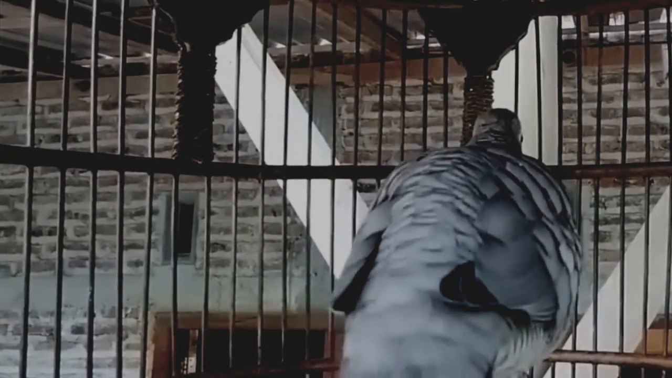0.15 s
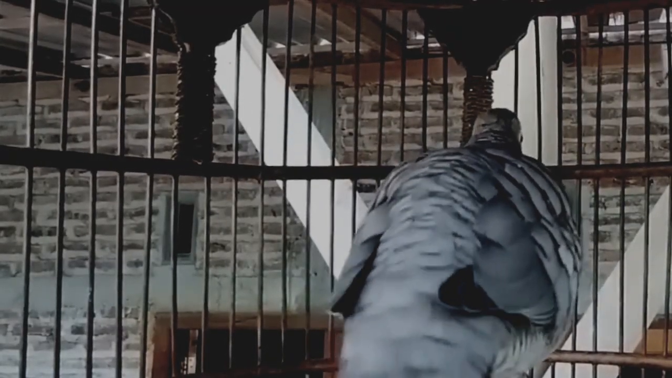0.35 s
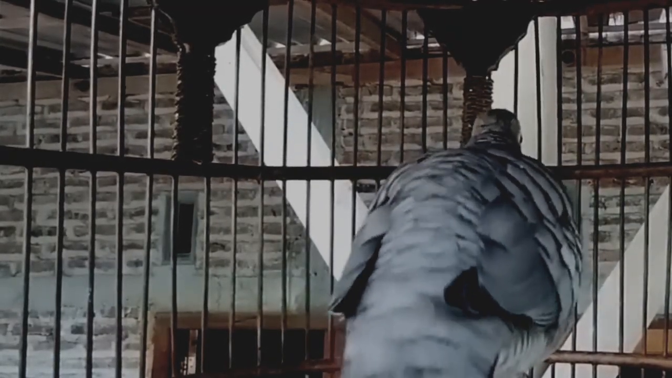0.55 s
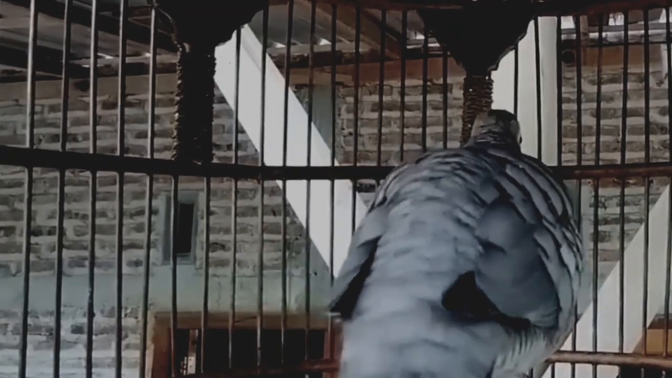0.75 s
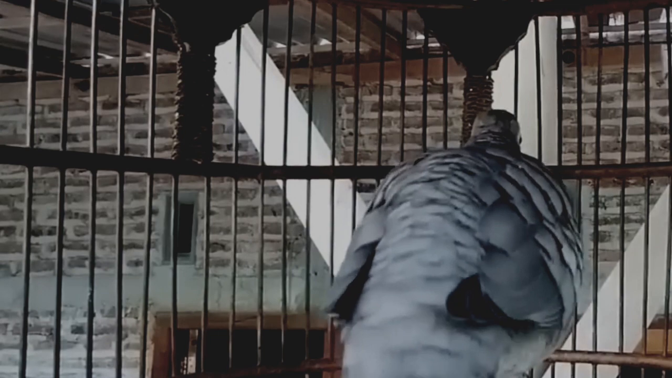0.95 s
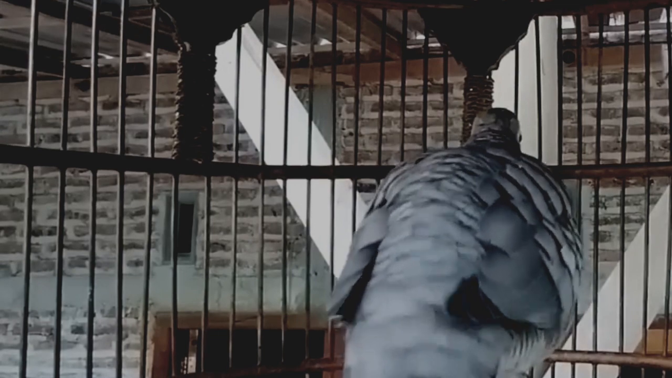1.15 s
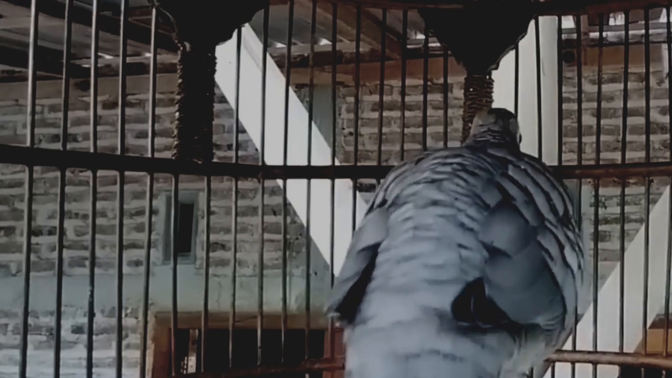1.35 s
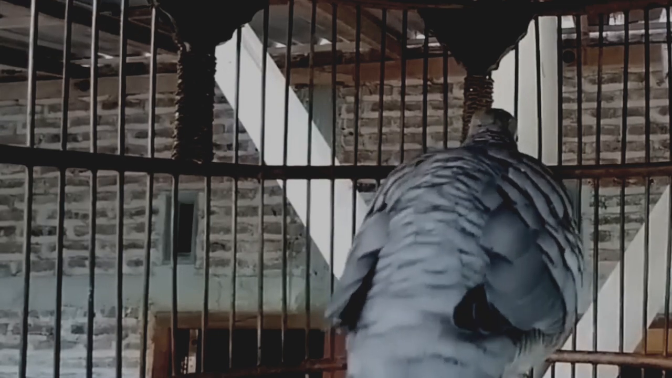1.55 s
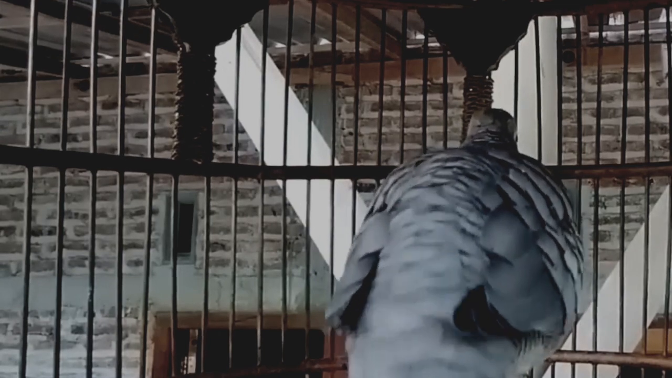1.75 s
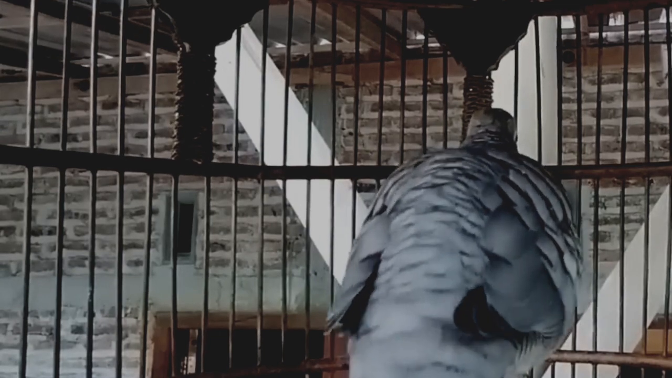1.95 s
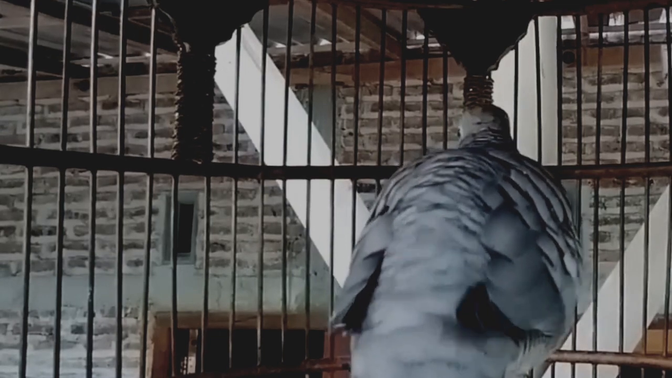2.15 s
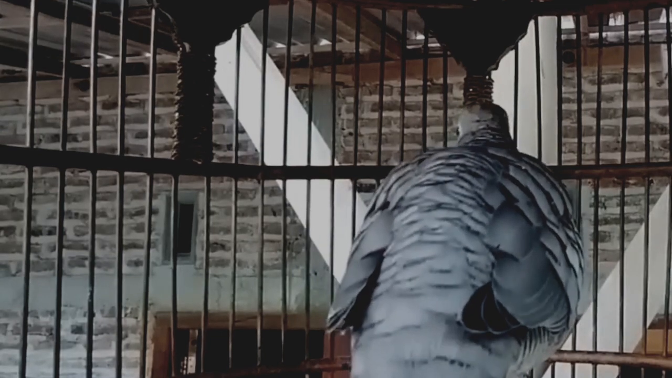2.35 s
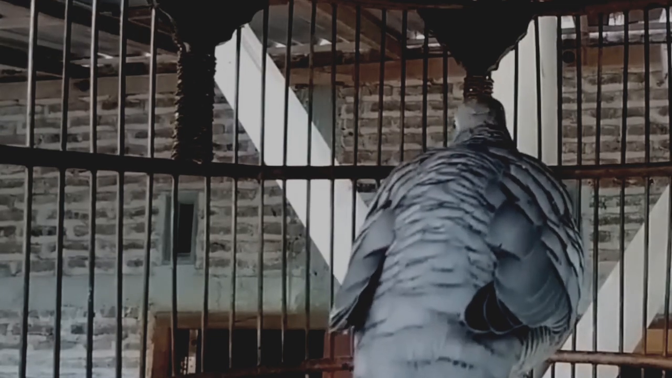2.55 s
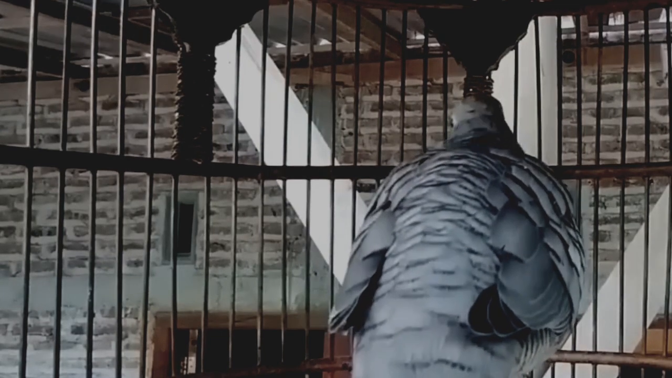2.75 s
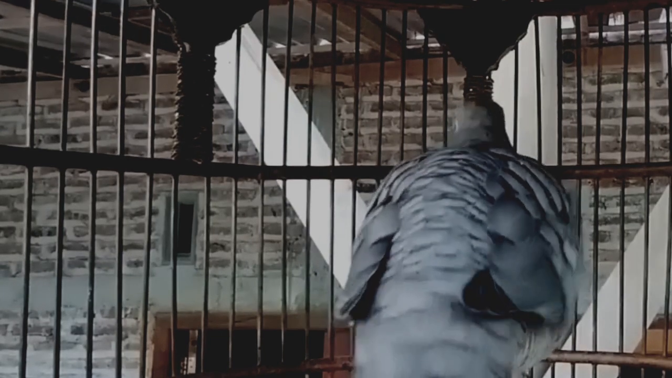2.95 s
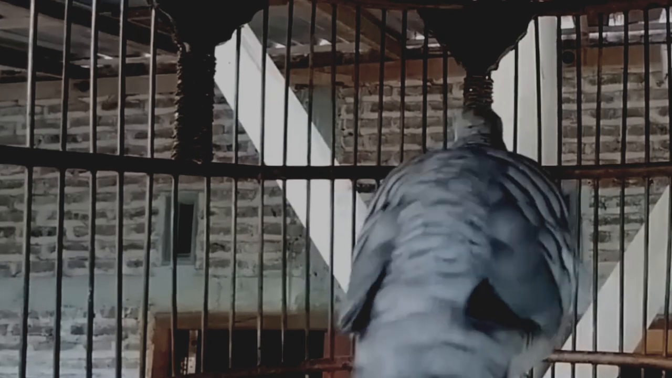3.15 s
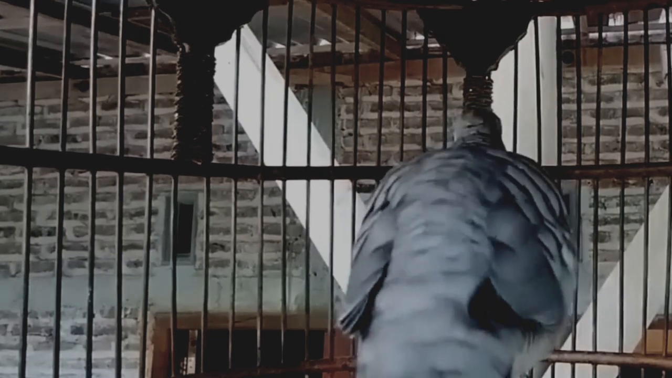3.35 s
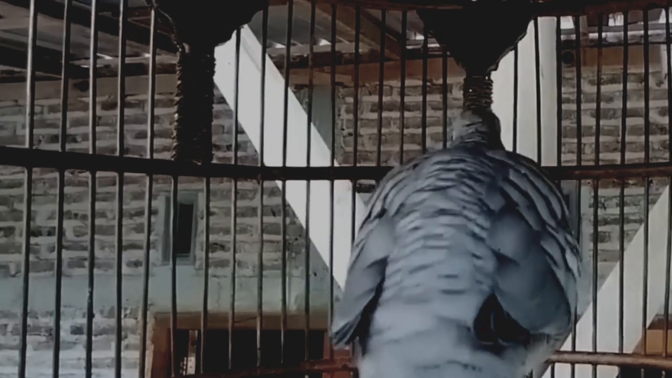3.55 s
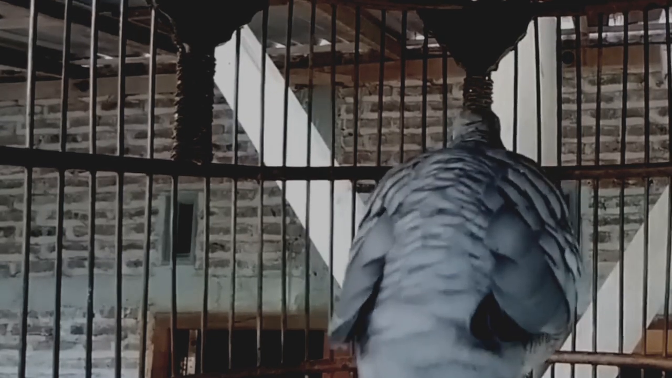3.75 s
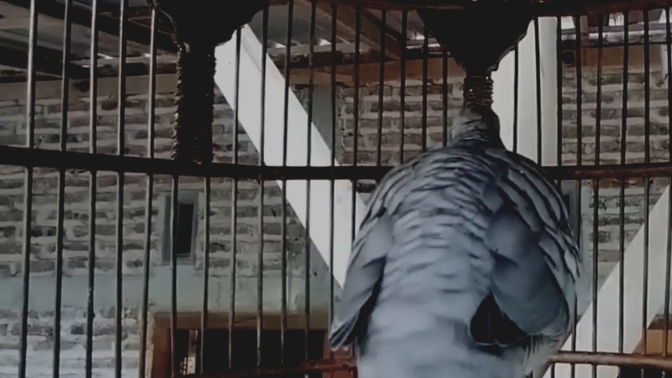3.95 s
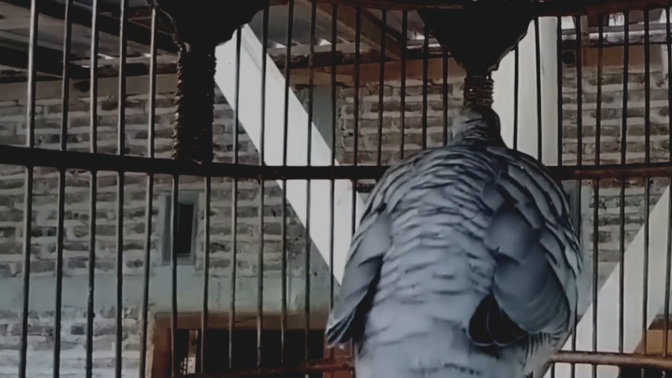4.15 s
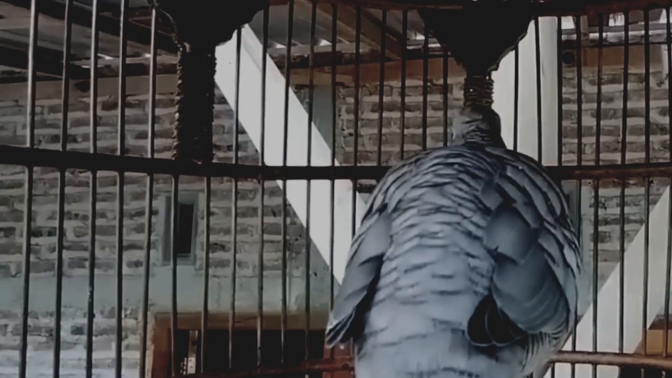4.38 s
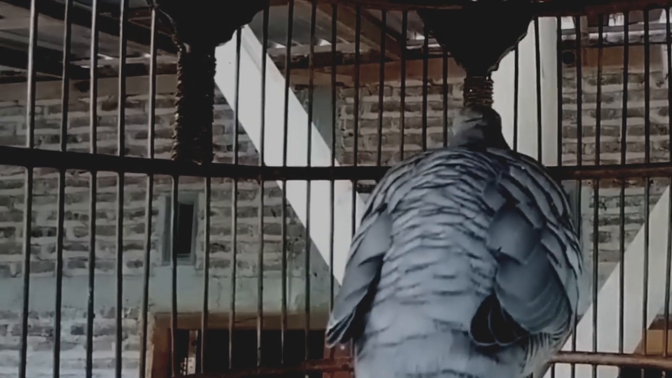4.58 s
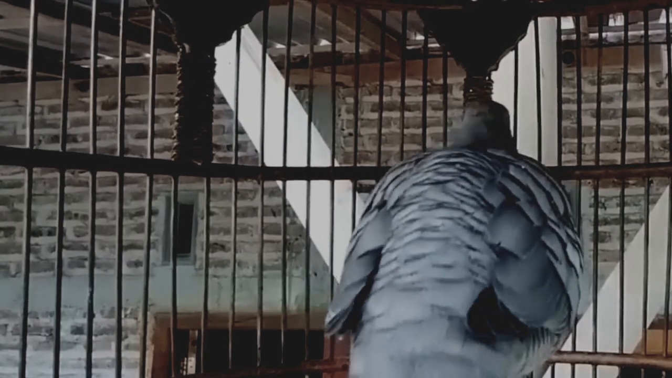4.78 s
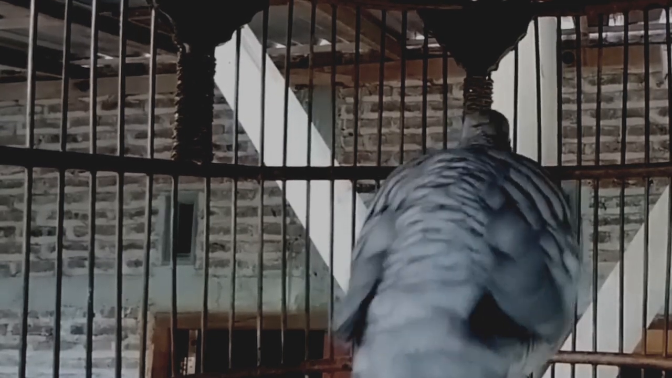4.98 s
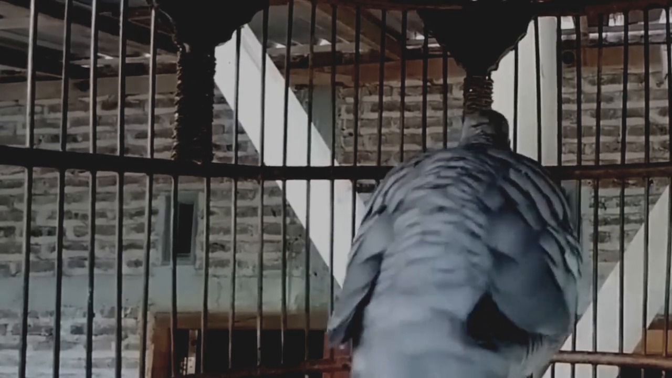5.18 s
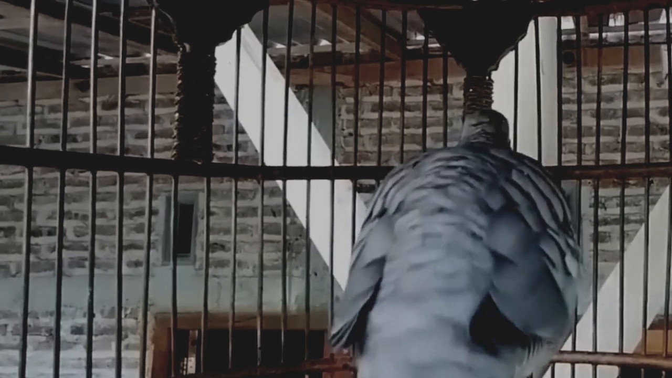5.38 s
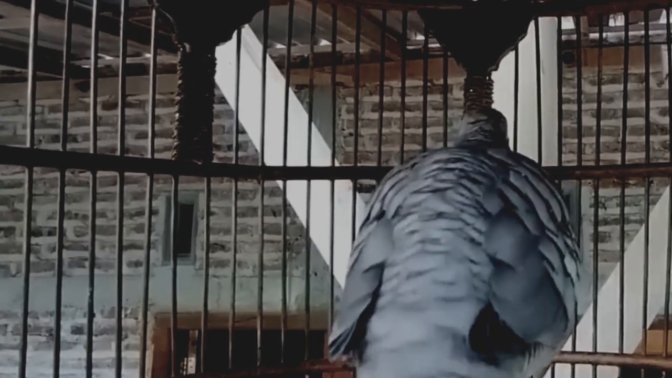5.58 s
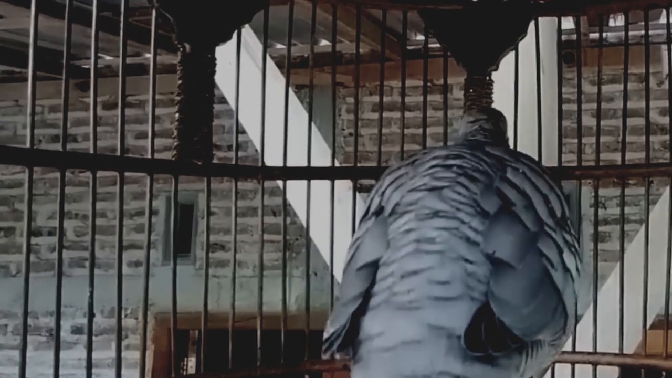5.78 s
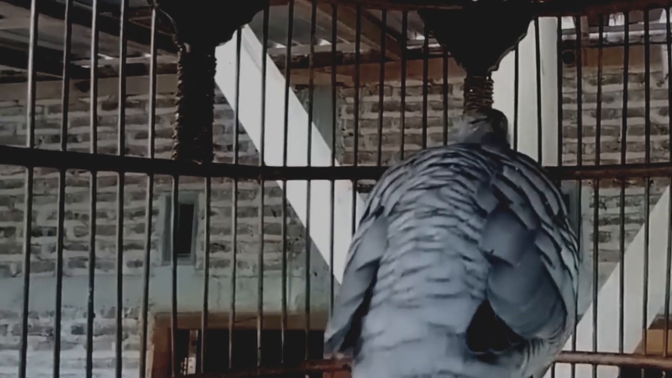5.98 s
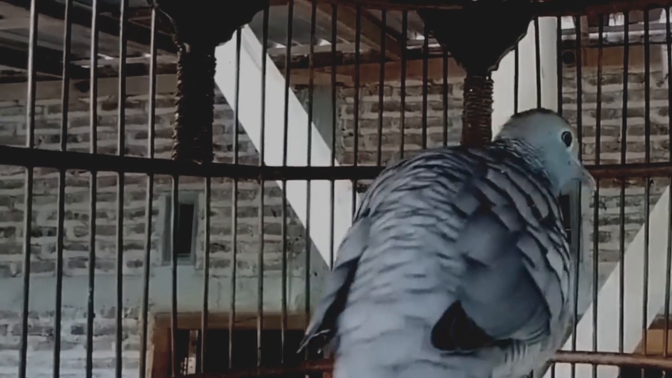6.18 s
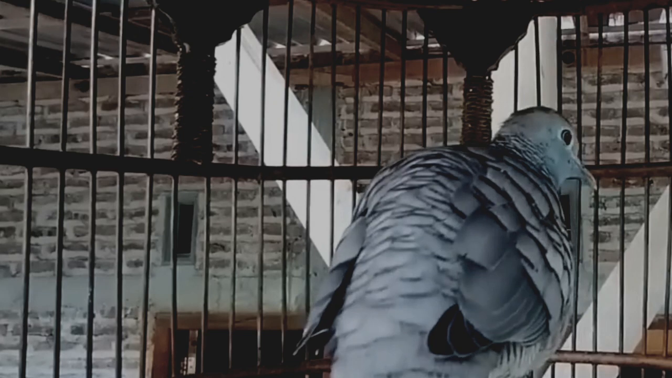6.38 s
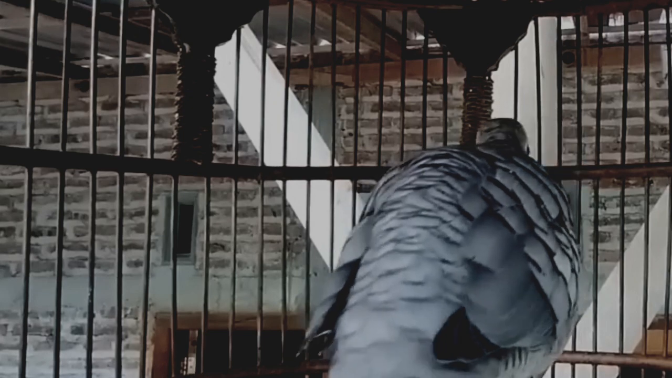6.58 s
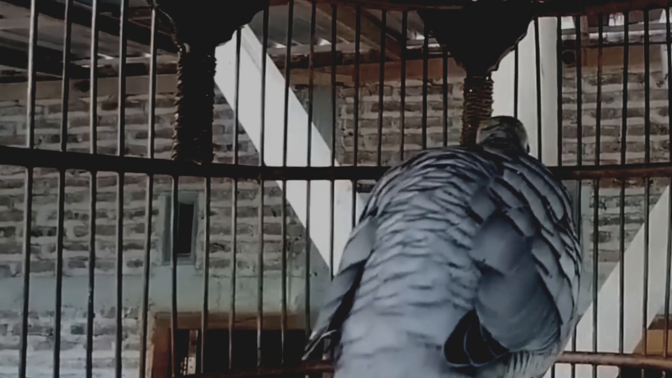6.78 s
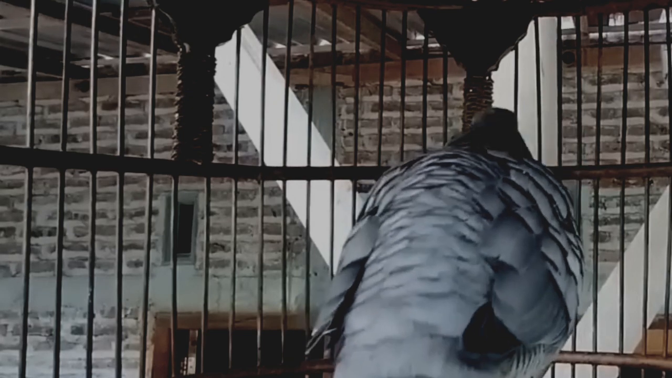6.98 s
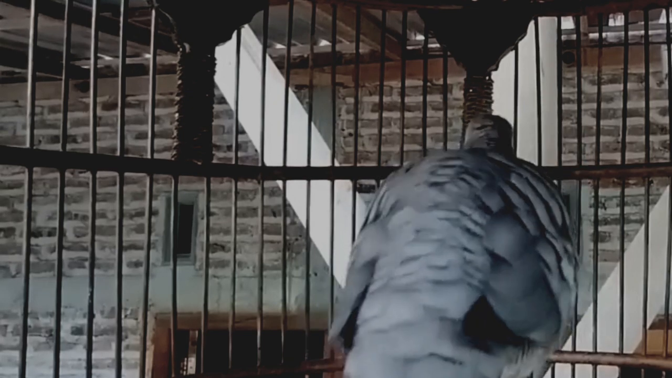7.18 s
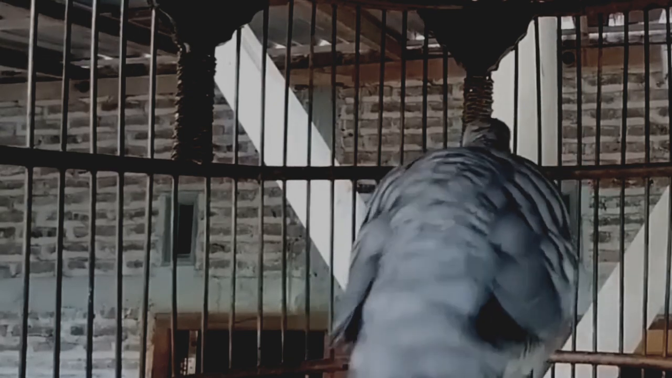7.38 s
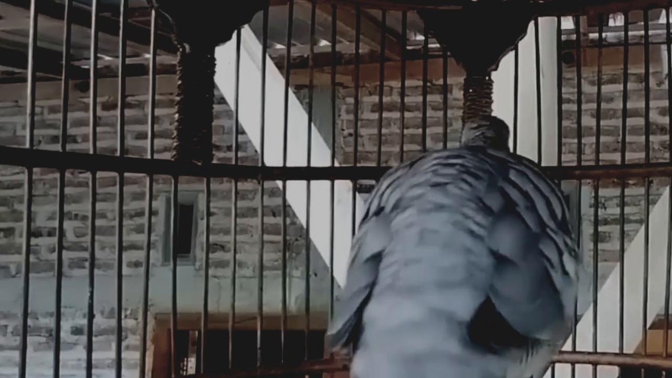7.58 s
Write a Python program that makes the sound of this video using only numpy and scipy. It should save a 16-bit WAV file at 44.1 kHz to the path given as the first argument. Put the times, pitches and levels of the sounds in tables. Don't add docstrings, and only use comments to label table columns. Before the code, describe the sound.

A dove in a cage dominates, loud and hollow, ringing off brick and roof. Steady coos at about five a second come first, then quick trills that decelerate, separated by rests. A second dove overlaps at the start, middle and end, and very faint ones answer far away. Regular thin chirps, a few raspy ones, soft claw taps, a distant flock, a faint pulsing insect and low traffic fill the yard behind the close microphone.

```python
import sys
import numpy as np
from scipy import signal
from scipy.fft import rfft, irfft, next_fast_len
from scipy.io import wavfile
from scipy.ndimage import uniform_filter1d, minimum_filter1d

SR = 44100
rng = np.random.default_rng(int(sys.argv[2]) if len(sys.argv) > 2 else 0)


def dump(signal):
    limited = np.clip(np.atleast_2d(signal).T, -1, 1)
    pcm = np.round(limited * 32767).astype(np.int16)
    wavfile.write(sys.argv[1], SR, pcm)


def invert_db(level):
    return 10 ** (np.asarray(level, dtype=float) / 20)


N = 336483

# voice break t/s, hold/s, held f/Hz, level/dB
SLOW_COOS = [(0.108, 0.078, 1218, -3.5), (0.312, 0.076, 1218, -4), (0.516, 0.074, 1211, -2),
             (0.724, 0.074, 1212, -2.5), (0.934, 0.074, 1211, -1), (1.147, 0.077, 1209, -2),
             (1.366, 0.077, 1201, -2.5), (1.584, 0.075, 1192, -3), (1.82, 0.053, 1182, -2.5),
             (2.022, 0.065, 1177, -2), (2.236, 0.064, 1170, -3.5)]
# voice break t/s, hold/s, held f/Hz, level/dB
TRILLS = [(3.129, 0.023, 1210, -2), (3.182, 0.016, 1167, -3.5), (3.235, 0.021, 1152, -4),
          (3.323, 0.024, 1142, -4), (3.419, 0.022, 1149, -2.5), (3.527, 0.027, 1143, -3.5),
          (3.649, 0.028, 1164, -2), (3.795, 0.049, 1163, -1.5), (3.996, 0.068, 1163, -5.5),
          (4.98, 0.025, 1208, -3.5), (5.026, 0.024, 1198, -3), (5.08, 0.02, 1138, -4),
          (5.155, 0.024, 1133, -5.5), (5.253, 0.023, 1147, -3.5), (5.364, 0.027, 1149, -3.5),
          (5.488, 0.025, 1167, -2), (5.634, 0.079, 1171, -4), (7.297, 0.011, 1260, -4),
          (7.33, 0.029, 1209, -3.5), (7.378, 0.028, 1197, -4), (7.438, 0.018, 1184, -5.5),
          (7.54, 0.032, 1132, -6.5)]
# multiple, left level/dB, right level/dB, right phase/rad, extra in lead-in/dB
OVERTONES = [(2, -48.5, -53, 0.75, 7), (3, -52.5, -45, 1.4, -13.5), (4, -58, -53.5, 0.4, -17.5),
             (5, -54.5, -40.5, 6.3, -20), (6, -53, -55, 0.67, -21)]
# f/Hz, width/Hz, level/dB
SCRATCH_MODES = [(882, 430, 6), (1297, 185, 8.5), (1640, 300, -24.5)]
ECHO_S = [
    [.0137, .0171, .0244, .0405, .059, .081],
    [.0137, .0176, .0234, .0414, .0497, .066],
]
ECHO_DB = [
    [-17, -23, -25.5, -15.5, -34, -26.5],
    [-17, -21.5, -25.5, -17.5, -27.5, -27],
]
# t/s, low climb/s, high hold/s, f after break/Hz, level/dB
NEIGHBOUR_COOS = [
    (-.074, 0.033, .052, 1260, -15),
    (0.186, .034, 0.083, 1237, -17),
    (3.725, 0.05, 0.13, 1260, -17.5),
    (4.122, .032, .05, 1280, -17),
    (4.294, 0.048, .07, 1293, -17.5),
    (7.609, 0.056, .06, 1280, -14.5),
]
# t/s, length/s, top f/Hz, level/dB
NEIGHBOUR_HOOTS = [
    (0.427, 0.036, 1180, -16.5),
    (3.934, 0.035, 1133, -16.5),
    (7.459, 0.044, 1339, -20),
    (7.488, 0.087, 1187, -13.5),
]
# t/s, low climb/s, high hold/s, f after break/Hz, level/dB
FAR_COOS = [
    (6.579, 0.032, .11, 1244, -47.5),
]
# t/s, length/s, top f/Hz, level/dB
FAR_HOOTS = [
    (6.714, .04, 1220, -49),
    (6.751, .045, 1152, -47),
    (6.811, .04, 1102, -45.5),
    (6.871, 0.023, 1020, -50),
    (6.938, 0.027, 1003, -48.5),
    (7.024, 0.043, 1138, -46),
]
# t/s, length/s, f/Hz, level/dB
LOW_MOANS = [
    (1.15, 0.18, 515, -48.5),
    (2.117, 0.081, 625, -48.5),
    (2.286, 0.23, 638, -43.5),
    (2.42, 0.2, 628, -50),
]
# t from start/s, f/Hz, level/dB
RISING = [(0, 4500, -62), (.012, 5020, -52), (.035, 5060, -62), (.048, 5260, -49), (.09, 5400, -52),
          (.13, 6000, -48), (.165, 7300, -48), (.18, 7550, -51), (.2, 7550, -66)]
# t/s, level/dB
RISING_AT = [
    (0.093, 5),
    (4.227, 4.5),
    (6.83, 2.5),
]
# t from start/s, f/Hz, level/dB
TICK = [(0, 3412, -68.5), (.008, 4270, -59.5), (.014, 4843, -53.5), (.035, 4765, -58), (.08, 4790, -73.5)]
# t from start/s, f/Hz, level/dB
SWOOP = [(.052, 4360, -75.5), (.062, 3440, -58.5), (.075, 3150, -55.5), (.095, 2740, -54),
         (.115, 2400, -72)]
# t/s, tick level/dB, swoop level/dB
CHIRPS_AT = [(.085, -1.5, -9), (.455, 1.5, -8.5), (0.826, 4, -19), (1.194, -0.5, 4), (1.565, 8.5, 7),
             (1.765, 4, 2), (2.163, 4.5, -1.5), (2.52, 3.5, 6.5), (2.88, 0.5, -5), (3.24, 2.5, 5),
             (3.61, 5, 5), (3.974, 6, -2), (4.375, 4, 0), (4.751, 4, 0.5), (5.138, 2, 3.5), (5.495, 4, 6),
             (5.855, 2, 4.5), (6.222, 4.5, 1), (6.588, 1.5, 4.5), (6.953, 2, 4), (7.279, 5.5, 6.5)]
# t before stretching/s, share of top f, level/dB
ARC = [(0, .8, -68), (.02, .93, -59), (.045, 1, -57.5), (.07, .97, -58), (.095, .87, -54), (.105, .8, -68)]
# t/s, top f/Hz, stretch, level/dB
ARCS_AT = [(0.549, 2930, 1.4, -2.5), (0.799, 3170, 1.5, -6), (1.05, 2790, 1.54, -4),
           (1.318, 3480, 0.89, -3.5), (1.78, 3470, 1.04, 1.5), (2.198, 3300, .6, 2.5),
           (2.661, 2874, 0.66, 7), (2.734, 3350, 0.32, 2), (3.029, 2834, 0.92, 3.5), (3.1, 3210, 0.63, 4),
           (4.569, 3770, 0.7, 0), (5.798, 2870, 0.38, 6.5), (6.057, 3490, 0.95, 1), (6.254, 2860, 0.39, 7),
           (6.513, 3390, 1.1, 1.5), (6.718, 2835, 0.32, 11.5), (6.975, 3510, 0.96, 2.5)]
# t/s, length/s, low f/Hz, high f/Hz, level/dB
RASPS = [
    (2.365, 0.11, 5200, 6290, -56),
    (2.879, 0.071, 4710, 6960, -48),
    (4.208, 0.051, 5110, 6960, -55),
    (6.447, 0.12, 5000, 5890, -58),
]
# t/s, peak level/dB, top f/Hz
TAPS = [
    (3.043, -28.5, 4050),
    (4.091, -31.5, 4120),
    (4.893, -27, 3950),
    (5.126, -21.5, 4020),
    (7.203, -33.5, 3980),
    (7.606, -26, 4010),
]
# f/Hz, level per Hz/dB
RUMBLE = [(13, -31), (38, -0.5), (92, -5.5), (141, -10.5), (281, -11.5), (563, -24), (920, -29.5),
          (1010, -27.5), (1180, -34), (1290, -34), (2200, -36), (2690, -35), (4110, -37), (4600, -39),
          (5980, -69), (10100, -120)]
# f/Hz, level per Hz/dB
HISS = [(4200, -20), (5000, -4), (5300, -5), (5900, -3), (6400, -3), (6750, -5), (7050, -11), (7900, -12),
        (9300, -4), (9800, -5), (10600, -13), (11200, -23), (13000, -12), (15300, -19)]
# f/Hz, likeness
LIKENESS = [(60, 0.68), (150, 0.94), (380, 0.8), (940, 0.11), (2360, 0), (5910, 0), (14800, 0.41)]

START_HZ, LEAD_HZ, RISE_S = 783.7, 982.2, 0.0081
LEAD_START_DB, LEAD_END_DB, LOW_GROWTH_S = -20.5, 0.5, 0.022
RING_ON_S, CATCH_S = 0.003, 0.005
ARCH_UP, ARCH_DOWN = 0.034, 0.035
RELEASE_S, SLOW_SAG_DB, TRILL_SAG_DB = 0.014, -1, -9
GLIDE_S = 0.007
PITCH_JITTER_RAD = 0.007
WAVER_DB = 1.8
LAST_BREAK_S = -0.14
LEAD_MAX_S, LEAD_REST_S = 0.030, 0.115
SCRATCH_MIN_S, SCRATCH_MAX_S, SCRATCH_REST_S = 0.003, 0.017, 0.5
SCRATCH_DB, FLUTTER_HZ = -13.5, 300
DOVE_LEFT_DB = 1.5
PORCH_T60_S, PORCH_DB = 0.55, -23.5
WALL_HZ, WALL_WIDTH_HZ = 975, 130
SIDE_HZ, SIDE_WIDTH_HZ = 1260, 440
SIDE_IN_STEP, SIDE_TURNED = 0.17, 0.25
LINGER_HZ, LINGER_WIDTH_HZ, LINGER_DB, LINGER_T60_S = (943, 1120), 77, -28, 0.25
CLOSED_HZ, OPEN_HZ, CLIMB_HZ = 926, 1016, 1109
OPEN_S, BREAK_S, CLOSE_S, DROOP_HZ_PER_S = 0.01, 0.006, 0.012, 950
HOOT_FOOT = 1
LOW_EDGE_DB, LOW_PEAK = -12, 0.5
YARD_T60_S, YARD_DB, BIRDS_LEFT_DB = 0.55, 0.5, 4
RASP_PER_S, RASP_DEPTH = 72, 0.85
CHATTER_LOW_HZ, CHATTER_HIGH_HZ, CHATTER_PER_S, CHATTER_DB = 2500, 3800, 20, -62
RUMBLE_DB, HISS_DB = -38, -56.5
INSECT_HZ, INSECT_WIDTH_HZ, INSECT_PER_S, INSECT_DB = 6460, 110, 13.3, -62
HUM_HZ, HUM_WIDTH_HZ, HUM_DB = 74, 22, -42.5
CEILING = 0.93


def dove():
    tone, overtones = np.zeros(N), np.zeros((2, N))
    notes = near_notes()
    chance = rng.standard_normal((len(notes), 8000))
    for (s, lead, hold, hz, db, scratch, sag_db), noise in zip(notes, chance):
        t = np.arange(-lead, hold + RELEASE_S, 1 / SR)
        low, low_hz = low_register(t, lead, db)
        high, high_hz = high_register(t, hold, hz, db, sag_db)
        low_phase, high_phase = 2 * np.pi * np.cumsum([low_hz, high_hz], axis=1) / SR
        at_break = int(lead * SR)
        high_phase += low_phase[at_break] - high_phase[at_break] + 3.0 + 0.5 * noise[0]
        add(tone, s - lead, low * np.sin(low_phase) + high * np.sin(high_phase))
        add(overtones, s - lead, note_overtones(t, low, high, low_hz, high_hz, noise))
        add(tone, s - lead - scratch, throat_scratch(scratch, db, noise))
    waver = invert_db(WAVER_DB * (0.6 * drift(35) + 0.8 * drift(95)))
    return tone * waver, overtones * invert_db(4 * drift(70))


def near_notes():
    s, hold, hz, db = np.transpose(SLOW_COOS + TRILLS)
    rest_s = np.diff(s, prepend=LAST_BREAK_S)
    lead = LEAD_MAX_S * (1 - np.exp(-rest_s / LEAD_REST_S))
    scratch = SCRATCH_MIN_S + SCRATCH_MAX_S * (1 - np.exp(-rest_s / SCRATCH_REST_S))
    sag_db = [SLOW_SAG_DB] * len(SLOW_COOS) + [TRILL_SAG_DB] * len(TRILLS)
    return np.transpose([s, lead, hold, hz, db, scratch, sag_db])


def low_register(t, lead, db):
    since = t + lead
    hz = LEAD_HZ - (LEAD_HZ - START_HZ) * np.exp(-since / RISE_S)
    grown = np.clip(since / LOW_GROWTH_S, 0, 1) ** 0.38
    level = invert_db(db + LEAD_START_DB + (LEAD_END_DB - LEAD_START_DB) * grown)
    level *= np.clip(since / 0.00051, 0, 1)
    return level * np.exp(-(np.maximum(t, 0) / RING_ON_S) ** 2), hz


def high_register(t, hold, hz, db, sag_db):
    end = hold + RELEASE_S
    u = np.clip(t / end, 0, 1)
    arch_hz = hz * (1.008 - ARCH_UP * (1 - u) ** 4 - ARCH_DOWN * u ** 3)
    caught = np.sin(np.clip(t / CATCH_S + 0.27, 0, 1) * np.pi / 2) ** 2
    closing = np.sin(np.clip((end - t) / RELEASE_S, 0, 1) * np.pi / 2) ** 2
    return invert_db(db + sag_db * u) * caught * closing, arch_hz


def note_overtones(t, low, high, low_hz, high_hz, noise):
    crossed = 0.5 + 0.5 * np.tanh(t / GLIDE_S + 0.3)
    phase = 2 * np.pi * np.cumsum(low_hz + crossed * (high_hz - low_hz)) / SR
    phase += PITCH_JITTER_RAD * np.cumsum(uniform_filter1d(noise[:len(t)], size=80))
    out = np.zeros((2, len(t)))
    for k, left_db, right_db, turn, lead_db in OVERTONES:
        level = np.hypot(invert_db(lead_db) * low, high * crossed ** (4 * k - 6))
        out += invert_db([[left_db], [right_db]]) * level * np.sin(k * phase + np.array([[0], [turn]]))
    return out


def throat_scratch(scratch, db, noise):
    t = np.arange(0, min(scratch, 0.04) + 0.0073, 1 / SR)
    cycle = np.cumsum(FLUTTER_HZ * (1 + t / 0.11)) / SR
    slaps = np.diff(np.floor(cycle), prepend=-1) * 4.5 + 0.5 * noise[:len(t)]
    throat = np.zeros(len(t))
    for hz, width_hz, mode_db in SCRATCH_MODES:
        throat += invert_db(mode_db) * resonance(resonance(slaps, hz, width_hz), hz, width_hz)
    grow = (0.24 + 0.58 * t / t[-1]) * np.clip((t[-1] - t) / 0.0039, 0, 1)
    return invert_db(db + SCRATCH_DB) * grow * rms_one(band(throat, 630, 1300))


def porch(x):
    dull = resonance(x, WALL_HZ, WALL_WIDTH_HZ)
    high = resonance(resonance(x, SIDE_HZ, SIDE_WIDTH_HZ), SIDE_HZ, SIDE_WIDTH_HZ)
    quarter_ahead = np.gradient(high) * SR / (2 * np.pi * SIDE_HZ)
    side = SIDE_IN_STEP * high + SIDE_TURNED * quarter_ahead
    out = np.array([x + side, x - side])
    out += invert_db(PORCH_DB) * diffuse(0.71 * x + dull, PORCH_T60_S)
    for port, delays, levels in zip(out, ECHO_S, ECHO_DB):
        for k, (delay, db) in enumerate(zip(delays, levels)):
            add(port, delay, invert_db(db) * (x if k < 3 else dull))
    return out


def linger():
    white = rng.standard_normal((2, N))
    both = np.zeros((2, N))
    for hz in LINGER_HZ:
        both += resonance(resonance(white, hz, LINGER_WIDTH_HZ), hz, LINGER_WIDTH_HZ)
    return rms_one(both) * invert_db(LINGER_DB - 60 * np.arange(N) / SR / LINGER_T60_S)


def neighbour_dove():
    x = whistles([coo(*row) for row in NEIGHBOUR_COOS] + [hoot(*row) for row in NEIGHBOUR_HOOTS])
    return x * invert_db([[0.3], [-0.3]]) + invert_db(-25.0) * diffuse(x, 0.66)


def far_doves():
    notes = [coo(*row) for row in FAR_COOS] + [hoot(*row) for row in FAR_HOOTS]
    x = whistles(notes + [moan(*row) for row in LOW_MOANS])
    return x + invert_db(-13) * diffuse(x, 0.49)


def coo(s, climb, hold, hz, db):
    at_break = s + climb
    end, last_hz = at_break + hold, hz - DROOP_HZ_PER_S * hold
    return [(s, CLOSED_HZ, db - 22), (s + OPEN_S, OPEN_HZ, db - 4),
            (at_break, CLIMB_HZ, db - 0.3), (at_break + BREAK_S, hz, db - 1.5),
            (end - CLOSE_S, last_hz, db), (end - CLOSE_S / 2, 0.89 * last_hz, db - 5.5),
            (end, CLOSED_HZ, db - 22.5)]


def hoot(s, length, hz, db):
    shape = [(0, HOOT_FOOT, -16), (0.27, 0.91, -0.5), (0.56, 1, -1.5), (0.8, 0.92, -3), (1, HOOT_FOOT, -22)]
    return [(s + share * length, pitch * hz, db + level) for share, pitch, level in shape]


def moan(s, length, hz, db):
    return [(s, 0.98 * hz, db + LOW_EDGE_DB), (s + LOW_PEAK * length, hz, db), (s + length, hz, db + LOW_EDGE_DB)]


def small_birds():
    notes = [shift(RISING, s, db) for s, db in RISING_AT]
    notes += [shift(TICK, s, db) for s, db, _ in CHIRPS_AT]
    notes += [shift(SWOOP, s, db) for s, _, db in CHIRPS_AT]
    notes += [shift(ARC, s, db, hz, stretch) for s, hz, stretch, db in ARCS_AT]
    birds = whistles(notes) * invert_db(3.5 * drift(55) - 2)
    for s, length, low_hz, high_hz, db in RASPS:
        add(birds, s, invert_db(db) * rasp(length, low_hz, high_hz))
    pan = invert_db([[BIRDS_LEFT_DB / 2], [-BIRDS_LEFT_DB / 2]])
    return birds * pan + invert_db(YARD_DB) * diffuse(birds, YARD_T60_S)


def shift(shape, s, db, pitch=1, stretch=1):
    return [(s + t * stretch, hz * pitch, level + db) for t, hz, level in shape]


def rasp(length, low_hz, high_hz):
    t = np.arange(0, length, 1 / SR)
    noise = rms_one(band(rng.standard_normal(8000), low_hz, high_hz))[:len(t)]
    flutter = 1 - RASP_DEPTH * np.cos(2 * np.pi * RASP_PER_S * t)
    return noise * flutter * np.clip(t / 0.0053, 0, 1) * np.exp(-2.0 * t / length)


def taps():
    out, t = np.zeros(N), np.arange(600) / SR
    for s, db, top_hz in TAPS:
        click = rms_one(band(rng.standard_normal(600), 400, top_hz))
        add(out, s, invert_db(db - 16.0) * click * np.exp(-t / 0.0084))
    return out


def chatter():
    rows = rng.random((200, 4))
    at = np.cumsum(-np.log(1 - rows[:, 0]) / CHATTER_PER_S)
    start_hz = CHATTER_LOW_HZ + (CHATTER_HIGH_HZ - CHATTER_LOW_HZ) * rows[:, 1]
    notes = []
    for s, hz, a, b in zip(at, start_hz, rows[:, 2], rows[:, 3]):
        if s < N / SR:
            notes.append([(s, hz, CHATTER_DB - 8),
                          (s + 0.02, hz * (0.95 + 0.1 * a), CHATTER_DB + 8 * b),
                          (s + 0.05, hz * (0.8 + 0.3 * a), CHATTER_DB - 8)])
    busy_db = np.interp(np.arange(N) / SR, [0, 1.9, 2.4, 3.2, 4.2, 7.7], [5, 4, 0, 3, -2, -2])
    return diffuse(whistles(notes) * invert_db(busy_db), 0.44)


def air():
    white = rng.standard_normal((2, N))
    pulse_phase = 2 * np.pi * np.cumsum(INSECT_PER_S * invert_db(0.4 * drift(3))) / SR
    throb = np.clip(np.sin(pulse_phase) + 0.55, 0, 1)
    buzz = band(white, INSECT_HZ - INSECT_WIDTH_HZ / 2, INSECT_HZ + INSECT_WIDTH_HZ / 2)
    insect = rms_one(buzz * throb)
    hum = rms_one(band(white[0], HUM_HZ - HUM_WIDTH_HZ / 2, HUM_HZ + HUM_WIDTH_HZ / 2))
    rumble = invert_db(RUMBLE_DB + 0.66 * drift(4.0)) * coloured(RUMBLE)
    hiss = invert_db(HISS_DB + 1.8 * drift(35)) * coloured(HISS)
    return rumble + hiss + invert_db(INSECT_DB) * insect + invert_db(HUM_DB) * hum


def whistles(notes):
    out = np.zeros(N)
    for note in notes:
        s, hz, db = np.transpose(note)
        t = np.arange(s[0], s[-1], 1 / SR)
        fade = np.clip(np.minimum(t - s[0], s[-1] - t) / 0.0042, 0, 1)
        glide_hz = uniform_filter1d(np.interp(t, s, hz), size=90)
        level = np.sqrt(2) * fade * invert_db(np.interp(t, s, db))
        add(out, s[0], level * np.sin(2 * np.pi * np.cumsum(glide_hz) / SR))
    return out


def diffuse(x, t60):
    t = np.arange(SR) / SR
    tails = rng.standard_normal((2, SR)) * invert_db(-60 * t / t60) * np.clip(t / 0.0053, 0, 1)
    tails /= np.sqrt(np.sum(tails ** 2, axis=1, keepdims=True))
    return signal.fftconvolve(x[None], tails, axes=1)[:, :N]


def coloured(spectrum):
    length = next_fast_len(N)
    hz = np.arange(1, length // 2 + 2) * SR / length
    alike = np.clip(at_hz(LIKENESS, hz), -1, 1)
    mid, side = rfft(rng.standard_normal((2, length))) * invert_db(at_hz(spectrum, hz)) * (hz > 15)
    both = np.sqrt(1 + alike) * mid + np.sqrt(1 - alike) * side * [[1], [-1]]
    return rms_one(irfft(both, length)[:, :N])


def resonance(x, hz, width_hz):
    r = np.exp(-np.pi * width_hz / SR)
    poles = [1, -2 * r * np.cos(2 * np.pi * hz / SR), r * r]
    return signal.lfilter((1 - r * r) / 2 * np.array([1, 0, -1]), poles, x)


def band(x, low_hz, high_hz):
    return signal.sosfilt(signal.butter(2, [low_hz, high_hz], "band", fs=SR, output="sos"), x)


def at_hz(points, hz):
    point_hz, value = np.transpose(points)
    return np.interp(np.log(hz), np.log(point_hz), value)


def drift(rate_hz):
    knots = rng.standard_normal(1000)
    return np.interp(np.arange(N) / SR * rate_hz, np.arange(1000), knots)


def rms_one(x):
    return x / np.sqrt(np.mean(x ** 2) + 1e-20)


def add(out, s, x):
    i = int(round(s * SR))
    a, b = max(i, 0), min(i + x.shape[-1], N)
    out[..., a:b] += x[..., a - i:b - i]


def scene():
    tone, overtones = dove()
    near = porch(tone) * invert_db([[DOVE_LEFT_DB / 2], [-DOVE_LEFT_DB / 2]]) + overtones + linger()
    others = neighbour_dove() + far_doves()
    return near + others + small_birds() + taps() + chatter() + air()


def band_limit(x):
    return signal.sosfilt(signal.butter(12, 15400, fs=SR, output="sos"), x)


def record(dry):
    gain = minimum_filter1d(np.minimum(1, CEILING / (np.abs(dry) + 1e-9)), size=401)
    limited = dry * uniform_filter1d(gain, size=201)
    return band_limit(limited)


dry = scene()
out = record(dry)
dump(out)
```